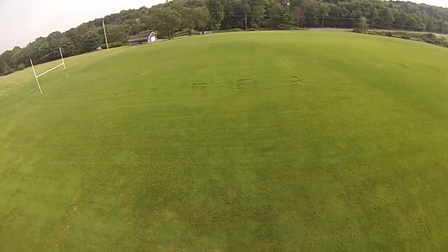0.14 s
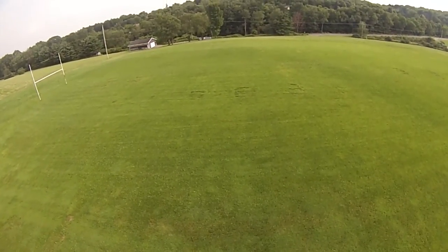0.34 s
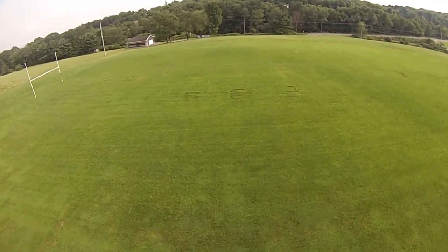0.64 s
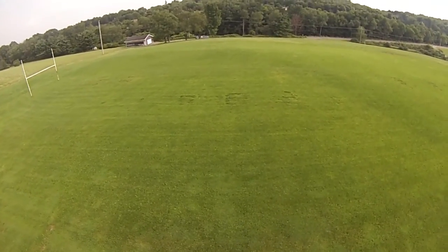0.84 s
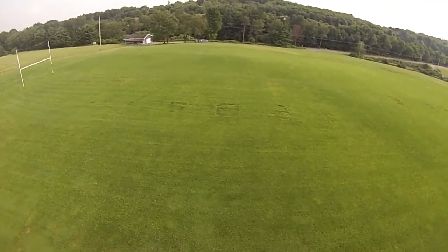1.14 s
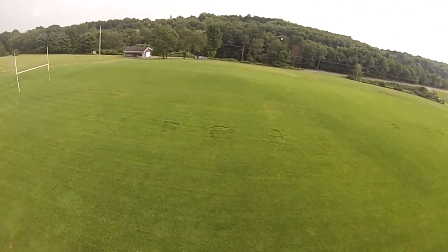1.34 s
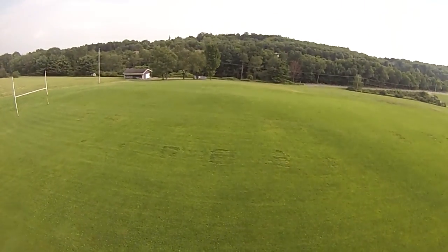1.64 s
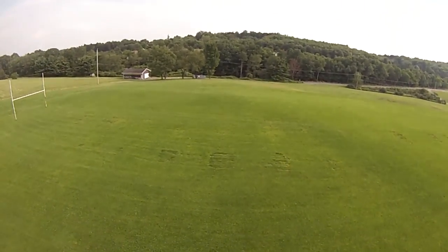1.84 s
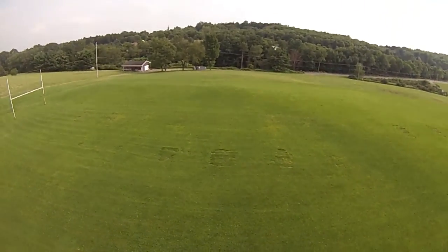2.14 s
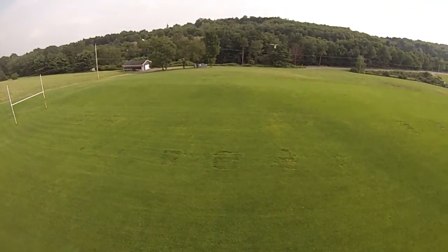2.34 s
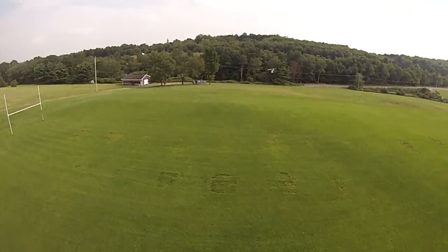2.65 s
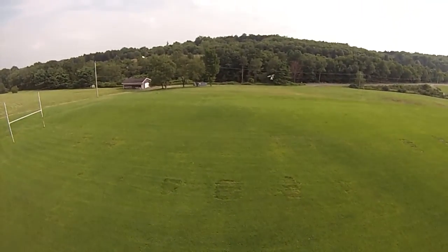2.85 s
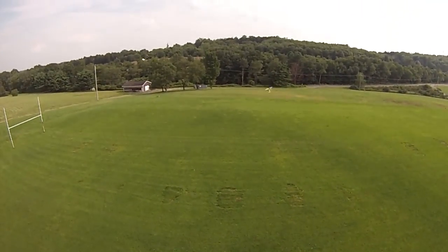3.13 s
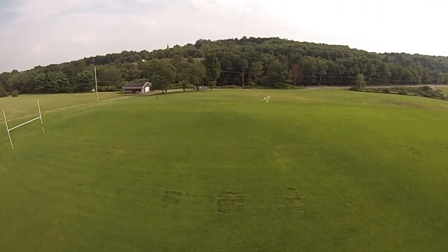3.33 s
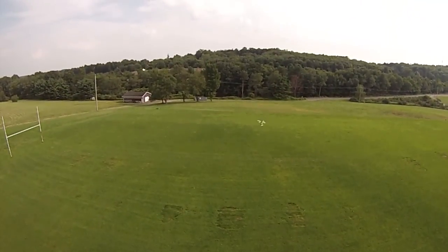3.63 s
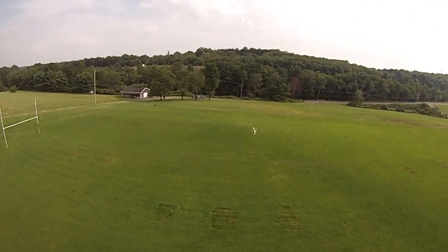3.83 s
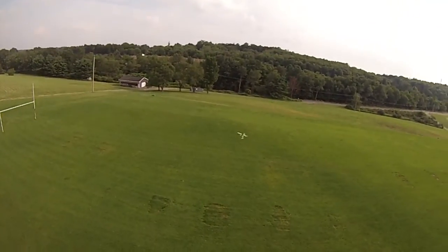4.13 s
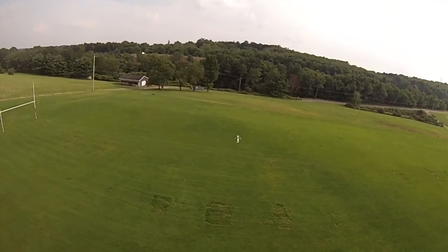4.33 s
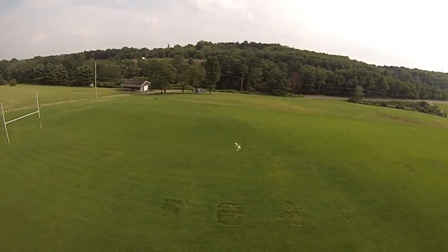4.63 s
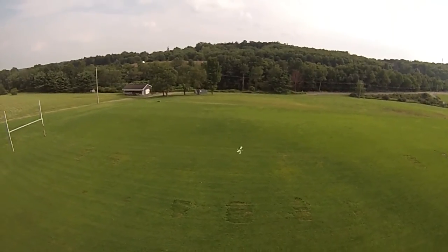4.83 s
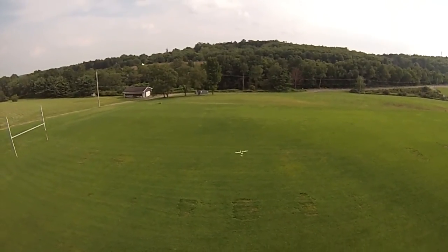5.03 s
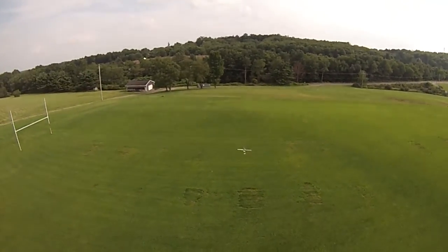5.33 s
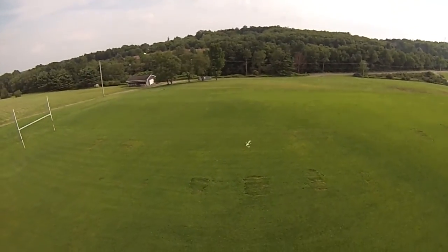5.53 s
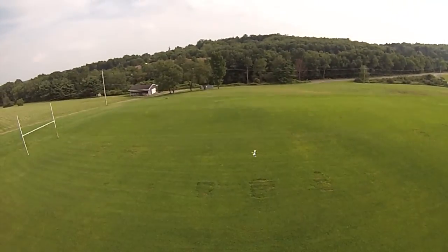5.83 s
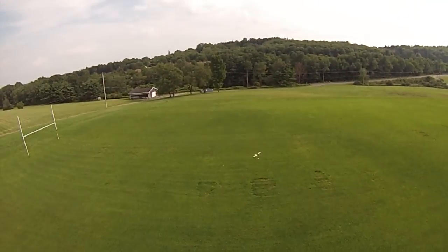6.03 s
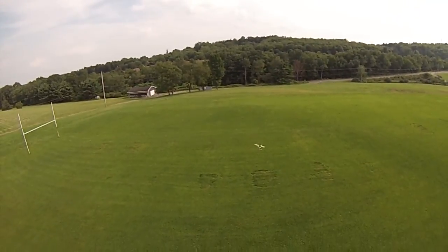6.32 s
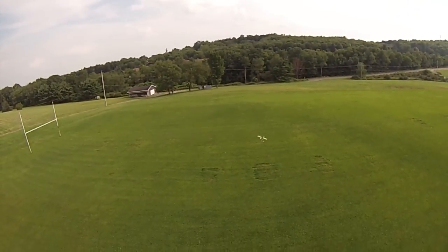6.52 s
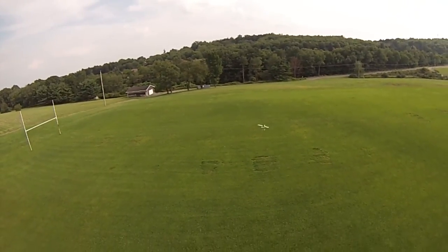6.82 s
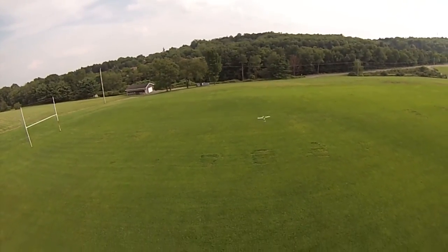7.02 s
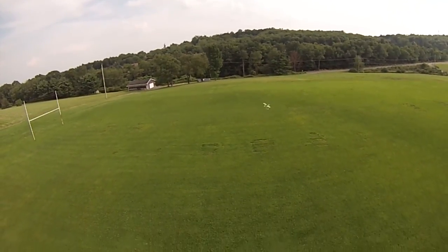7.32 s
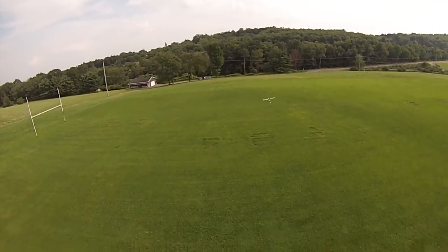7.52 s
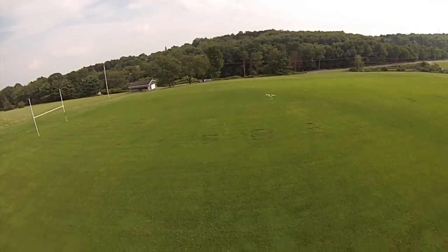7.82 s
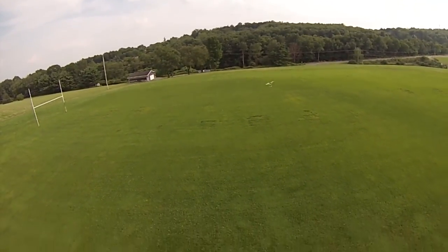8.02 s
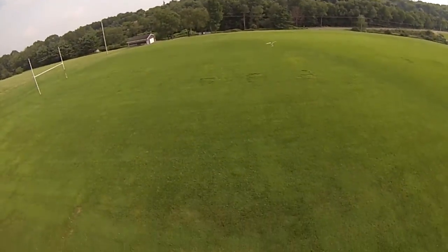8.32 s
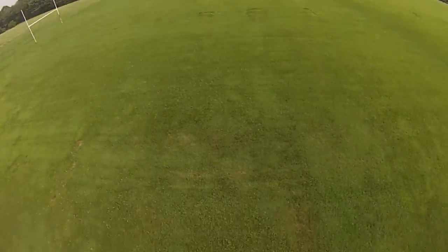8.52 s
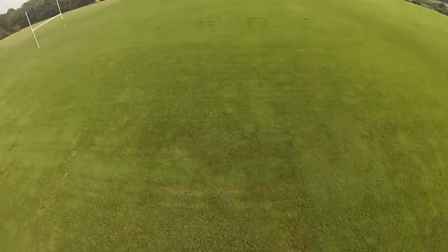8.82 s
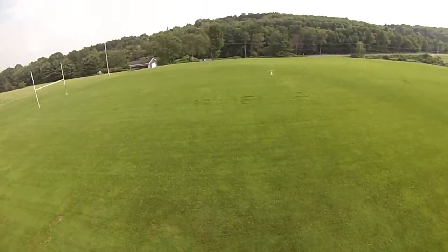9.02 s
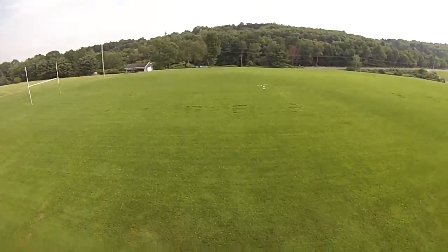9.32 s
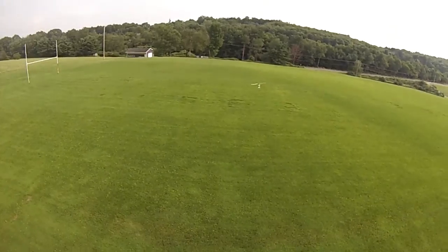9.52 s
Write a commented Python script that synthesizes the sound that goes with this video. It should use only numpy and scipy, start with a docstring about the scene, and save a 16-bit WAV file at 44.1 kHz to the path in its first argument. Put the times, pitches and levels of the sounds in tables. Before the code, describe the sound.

The microphone rides on a small quadcopter above a grassy field, very close to four spinning propellers. A dense, rough hum and buzz runs throughout, beating as the rotors drift apart in speed. Pitch sags gradually in the middle, then climbs and jumps about near the end, with soft wind gusts. Air wash, thin hiss and faint motor whistle sit above.

```python
"""Over a field, aboard a small quadcopter: the microphone is in the camera that it carries, close to all four rotors.
The two-blade rotors turn at slightly different speeds and beat; one is out of balance, two change speed to steer.
Sums of sines at multiples of each rotor's rate make the hum, blade tones, frame buzz and motor whine.
Noise pulsed by the blades drones in the camera case, washes and hisses; low noise is wind on the microphone.
A control tone with sidebands, a singing motor bell and a faint driver whistle complete the scene."""
import sys
import numpy as np
from scipy import signal
from scipy.fft import rfft, irfft, next_fast_len
from scipy.io import wavfile
from scipy.ndimage import uniform_filter1d, minimum_filter1d

SR = 44100
rng = np.random.default_rng(int(sys.argv[2]) if len(sys.argv) > 2 else 0)


def output_pcm(signal):
    """Save a mono or channel-first signal as 16-bit PCM at the path in sys.argv[1].

    Samples are clipped to [-1, 1] before scaling.
    """
    pcm = np.clip(np.atleast_2d(signal).T, -1, 1) * 32767
    wavfile.write(sys.argv[1], SR, np.round(pcm).astype(np.int16))


N = 426006
TIME = np.arange(N) / SR  # s

# Table levels are relative: each layer adds its own trims.
# unbalanced rotor's turning rate before small nudges; follows the throttle: t/s, f/Hz
THROTTLE_SPEED = [(0, 97.9), (.45, 97), (.7, 91.5), (1.99, 91.4), (2.15, 89.06), (2.35, 92.08),
                  (3.6, 87.94), (5.05, 88), (5.15, 93.1), (5.45, 89), (5.8, 94.4), (6.7, 92.2), (8, 92.13),
                  (8.1, 96.7), (8.38, 96.6), (8.5, 92.95), (8.78, 102.7), (9.1, 96.1), (9.3, 89),
                  (9.66, 86)]
# turning rate of the rotor nearest the microphone, before small nudges: t/s, f/Hz
NEAR_SPEED = [(0, 99.8), (.85, 90.45), (1.35, 92.6), (2.04, 91.5), (2.85, 88.3), (3.15, 84.3), (3.71, 81.7),
              (4.1, 83.83), (4.6, 78.94), (5.029, 77.6), (5.2, 84.1), (5.46, 73.76), (5.72, 82.6),
              (6.55, 87.9), (7.16, 95.4), (7.5, 90.75), (8.298, 100.9), (8.5, 93), (8.8, 92.54),
              (9.099, 105.3), (9.359, 88.8), (9.66, 86.15)]
# rate added to the throttle speed of the other two rotors while the craft tilts: t/s, f/Hz
STEERING_SPEED = [(0, 0), (1.15, .5), (1.45, 6), (2.3, 1), (3.9, .5), (4.6, -2), (5.901, 1.5), (6.5, -3),
                  (7.8, -1.5), (8.5, 5), (8.8, 1), (9.17, 15), (9.66, 11.5)]
# constant offsets of those two rotors from throttle plus steering, f/Hz
FAST_HZ, SLOW_HZ = 1.1, -6.5

# once-a-turn hum: t/s, level/dB
HUM_LEVEL = [(0.0, -22.3), (0.3, -20.5), (1.11, -23.4), (1.38, -16.5), (1.5, -22.4), (1.92, -21.5),
             (2.19, -28.6), (2.4, -20), (2.73, -25.5), (2.94, -19.5), (3.24, -27), (3.81, -21.5),
             (3.9, -24.8), (5.04, -27.5), (5.13, -22), (5.4, -24), (6.0, -17.5), (6.18, -20), (6.93, -19.5),
             (7.14, -25.5), (7.23, -16.5), (8.37, -19.7), (8.52, -27), (8.61, -17.5), (8.7, -21.5),
             (8.94, -17.5), (9.39, -27.5), (9.66, -25.5)]
# resonances of the camera mount: f/Hz, width/Hz, level/dB
MOUNT_MODES = [(455.5, 19, 4), (525.5, 12.3, 14.5), (555.8, 11, 9.5)]
# electronic tone from the flight controls: t/s, level/dB
CONTROL_LEVEL = [(0, -26.5), (1.3, -38), (1.6, -30), (2.2, -32), (2.7, -24.5), (3.3, -21), (3.7, -41),
                 (4.7, -16.5), (5.3, -30), (6.5, -39.5), (7.7, -27), (8.3, -24), (9.66, -23.5)]
CONTROL_HZ = 500
# blade tones: t/s, level/dB
BLADE_LEVEL = [(0.0, -24), (0.21, -34.5), (0.72, -21), (1.08, -32), (1.2, -18.5), (1.32, -25.2),
               (1.77, -23.5), (1.98, -30.5), (2.94, -23), (4.05, -20.5), (4.23, -26), (4.62, -19),
               (5.25, -24), (5.55, -17), (5.73, -25.5), (6.63, -24), (6.69, -33), (7.23, -26.0),
               (7.35, -35.5), (9.66, -23.3)]
# a rotor's vibration: multiple of the turning rate, level/dB
VIBRATION_ORDERS = [(3, -44.5), (4, -20), (5, -31.5), (6, -31), (7, -33.5), (8, -45.5), (10, -40.5),
                    (11, -43), (12, -39.5), (13, -40.5), (15, -42), (16, -40), (18, -47), (20, -45),
                    (21, -43.5), (22, -59.5), (24, -50.5)]
# the motor magnets' whine: multiple of the turning rate, level/dB
WHINE_ORDERS = [(14, -38.5), (28, -62), (42, -69.5), (56, -64.5)]
# resonances of the motor bell: f/Hz, width/Hz, level/dB
BELL_MODES = [(1315, 115, 9), (5030, 150, 6), (4530, 130, 5), (5200, 460, 4.5)]
# the mode in which a motor bell sings: f/Hz, width/Hz, level/dB
SINGING_BELL = (5090, 320, 15.2)

# wind noise at the microphone, spectrum: f/Hz, level/dB
WIND_SPECTRUM = [(12, -15), (25, -13), (37, -0.5), (52, -3.5), (68, -13.5), (100, -8), (140, -13),
                 (200, -15.5), (240, -21.5), (320, -24.5), (500, -33.5), (1500, -100)]
# gusts as the craft pitches forward and back: t/s, rise level/dB
GUST_RISES = [(8.5, 5.5), (8.8, 8.5), (9.29, 7)]
# spread (standard deviation) of a gust, t/s; wind before gusts and tilt, level/dB
GUST_SPREAD_S, WIND_DB = 0.077, -33
# camera case resonance, shaping its drone and lifting the buzz: f/Hz, level/dB
CASE_SPECTRUM = [(200, -100), (310, -25), (365, -18), (425, -9), (460, 1.5), (490, -1), (535, 1.5),
                 (580, 1), (620, -1), (660, -5.5), (720, -22), (820, -24.5), (1500, -100)]
# air washing off the blades, spectrum: f/Hz, level/dB
WASH_SPECTRUM = [(410, -38), (700, -5.5), (768, -9), (852, -7), (935, 0), (1060, 0), (1150, -6.5),
                 (1310, -3.5), (1400, -2.5), (1630, 0), (1770, -6.5), (1920, -8), (2330, -17.5),
                 (3050, -32.5), (3960, -49.5), (6710, -120)]
# blade hiss, spectrum: f/Hz, level/dB
HISS_SPECTRUM = [(1700, -16.5), (2900, 5.5), (3330, -5), (3650, 2), (4100, -3), (4500, 3), (4830, -4.5),
                 (5600, 2), (6100, -1.5), (7000, -11), (7950, -8), (9900, -18), (12700, -23.5),
                 (15000, -30)]
# small resonances of the shell, added to every noise: f/Hz, width/Hz, level/dB
SHELL_MODES = [(1330, 60, 4), (1652, 83, 2), (1874, 89, 3.5), (2440, 33, 3), (2440, 91, 0),
               (6300, 180, -4.5), (6550, 200, 1.5), (8700, 400, -4), (9100, 300, 2)]
# camera case drone: t/s, level/dB
DRONE_LEVEL = [(0.0, -16), (0.42, -19), (0.69, -16), (1.32, -17.2), (1.41, -12.5), (1.68, -19),
               (1.83, -13.5), (2.19, -21.5), (2.52, -18), (3.39, -15.5), (3.48, -23), (3.63, -16.1),
               (4.92, -17), (5.04, -18.1), (7.14, -16), (9.66, -16)]
# air wash: t/s, level/dB
WASH_LEVELS = [(0.0, -22.5), (0.18, -18), (0.24, -22.5), (1.38, -19), (2.4, -22.5), (3.24, -19),
               (3.78, -21.5), (3.93, -20), (4.98, -22.5), (5.7, -21.1), (6.03, -23), (6.12, -20),
               (6.72, -23.5), (6.99, -21.5), (8.4, -23), (8.58, -19.5), (8.73, -22), (9.66, -20)]
# blade hiss: t/s, level/dB
HISS_LEVELS = [(0.0, -41.5), (0.36, -46), (1.38, -42.5), (2.16, -48.5), (2.67, -45.5), (4.8, -44),
               (4.98, -47), (5.13, -44), (5.34, -45), (6.87, -41.5), (7.74, -42), (8.25, -44.5),
               (8.61, -43.4), (8.76, -46.5), (8.97, -40.5), (9.66, -44)]
EDGE_HZ = 15100  # top of the microphone's band


def gain_of(db):
    """Decibels to amplitude."""
    return np.exp(np.asarray(db, np.float32) * np.float32(np.log(10) / 20))


def evened(x):
    """Scales to an rms of one."""
    return x / np.sqrt(np.mean(x ** 2) + 1e-20)


def curve(rows):
    """A two-column table, joined by straight lines over time."""
    s, value = np.transpose(rows)
    return np.interp(TIME, s, value)


def read(points, hz):
    """A spectrum at any frequency, joined along log frequency."""
    f, value = np.transpose(points)
    return np.interp(np.log(hz + 1), np.log(f), value)


def bumps(modes, hz):
    """The dB that a few resonances add at each frequency."""
    hz = hz.astype(np.float32)
    return sum(db / (1 + (2 * (hz - f) / width) ** 2) for f, width, db in modes)


def wander(rate):
    """Smooth chance of about unit rms, with up to about rate changes a second."""
    t = np.linspace(0, TIME[-1], 4096)
    f = np.fft.rfftfreq(len(t), t[1])
    spectrum = rfft(rng.standard_normal(len(t))) / (1 + (f / rate) ** 2)
    return np.interp(TIME, t, evened(irfft(spectrum)))


def tone(turns):
    """A sine of about unit rms, starting anywhere in its cycle."""
    cycle = (turns - np.floor(turns)).astype(np.float32) + rng.random()
    return 2 ** .5 * np.sin(2 * np.pi * cycle)


def spin(hz, hunt=.005, hunt_rate=9):
    """Speed in Hz and angle in turns of a rotor; the stabiliser keeps nudging the throttle."""
    hz = hz * (1 + hunt * wander(hunt_rate))
    return hz, np.cumsum(hz) / SR


def imbalance(hz, turns, drone_db, hum_trim_db=0.2, waver_db=1.43, waver_rate=5,
              blade_db=-38, rattle_db=-17, flutter=0.42, flutter_rate=16, slip=0.049):
    """Once-a-turn shake hums and rattles the camera mount, hardest where order five or six meets a mode."""
    rattle = 0
    for order in (5, 6):
        level_db = drone_db + rattle_db + bumps(MOUNT_MODES, order * hz)
        strength = gain_of(level_db) * (1 + flutter * wander(flutter_rate))
        # the phase slips a little, in turns of this order
        rattle = rattle + strength * tone(order * turns + slip * wander(flutter_rate))
    hum_db = curve(HUM_LEVEL) + hum_trim_db + waver_db * wander(waver_rate)
    return gain_of(hum_db) * tone(turns) + gain_of(blade_db) * tone(2 * turns) + rattle


def controls(shake_turns, trim_db=-1.0, upper_db=-27, lower_db=-37, flutter=0.55):
    """The control tone holds its pitch; the shake gives it one sideband above and one below."""
    carrier = CONTROL_HZ * TIME
    upper = gain_of(upper_db) * tone(carrier + shake_turns)
    lower = gain_of(lower_db) * tone(carrier - shake_turns)
    plain = gain_of(curve(CONTROL_LEVEL) + trim_db) * tone(carrier)
    return plain + (1 + flutter * wander(13.0)) * (upper + lower)


def blade_tones(angles, steering_hz, near_db=-2.3, fast_db=-9.0, slow_db=-18,
                push_db_per_hz=.5, waver_db=1.75):
    """Two blades pass in each turn; the fast rotor grows louder as it pushes to steer."""
    level_db = curve(BLADE_LEVEL)
    shares_db = near_db, fast_db + push_db_per_hz * steering_hz, slow_db
    out = 0
    for share_db, turns in zip(shares_db, angles):
        out = out + gain_of(level_db + share_db + waver_db * wander(13)) * tone(2 * turns)
    return out


def buzz(hz, turns, flutter=0.34, flutter_rate=12, case_share=0.87):
    """Higher rotor orders flutter in turbulent air; the fourth to seventh swell at the case resonance."""
    out = np.zeros(N)
    for order, db in VIBRATION_ORDERS:
        lift_db = 0
        if order in range(4, 8):
            lift_db = case_share * np.maximum(read(CASE_SPECTRUM, order * hz), -20)
        out += gain_of(db + lift_db) * (1 + flutter * wander(flutter_rate)) * tone(order * turns)
    return out


def whine(hz, turns, flicker_db=3, flicker_rate=14):
    """Whistle of the motor's fourteen magnets, smeared by torque ripple, louder at the bell's modes."""
    ripple = .004 * wander(40)  # turns
    out = 0
    for order, db in WHINE_ORDERS:
        level_db = db + bumps(BELL_MODES, order * hz) + flicker_db * wander(flicker_rate)
        out = out + gain_of(level_db) * tone(order * (turns + ripple))
    return out


def singing(hz, hiss_db, level_db, ring_width=45, pull=.4, order=56):
    """A high whine order sets the bell singing: a fuzzy whistle drawn toward its mode, loudest there."""
    whine_hz = order * hz
    pitch = whine_hz + pull * (SINGING_BELL[0] - whine_hz)
    fuzz = wander(ring_width) + 1j * wander(ring_width)
    ring = fuzz * np.exp(2j * np.pi * np.cumsum(pitch) / SR)
    return gain_of(hiss_db + level_db + bumps([SINGING_BELL], whine_hz)) * ring.real


def switching(turns, hz, carrier_hz=16800, level_db=-78, order=42):
    """Motor driver switching, shifted down by the commutation rate: a faint whistle, loudest at low speed."""
    throttle_db = -.6 * np.maximum(hz - 80, 0)
    return gain_of(level_db + throttle_db) * tone(carrier_hz * TIME - order * turns + .3 * wander(60))


def coloured(drive, spectrum):
    """Gives a noise its spectrum and the resonances of the shell, at unit rms."""
    size = next_fast_len(N)
    hz = np.fft.rfftfreq(size, 1 / SR)
    response = gain_of(read(spectrum, hz) + bumps(SHELL_MODES, hz))
    return evened(irfft(rfft(drive, size) * response, size)[:N])


def wind(steering_hz, tilt_db_per_hz=0.44, full_tilt_hz=5, lumpy_db=2, lumpy_rate=6):
    """Lumpy low wind on the microphone; it grows as the craft tilts, with a few stronger gusts."""
    gusts_db = sum(db * np.exp(-.5 * ((TIME - s) / GUST_SPREAD_S) ** 2) for s, db in GUST_RISES)
    tilt_db = tilt_db_per_hz * np.clip(steering_hz, 0, full_tilt_hz)
    level_db = WIND_DB + gusts_db + tilt_db + lumpy_db * wander(lumpy_rate)
    return gain_of(level_db) * coloured(rng.standard_normal(N), WIND_SPECTRUM)


def chopped(angles, main_depth, other_depth, lopsided):
    """Noise that puffs at every blade passage, and once a turn at the unbalanced rotor."""
    main, *others = angles
    main_puffs = main_depth * tone(2 * main) + lopsided * tone(main)
    other_puffs = other_depth * sum(tone(2 * turns) for turns in others)
    return np.exp(main_puffs + other_puffs) * rng.standard_normal(N)


def stirred_air(angles, drone_db, case_db=-4.5, wash_db=-1.5, hiss_db=0.52,
                eddy_db=1.25, case_waver_db=1.5):
    """Chopped air drones in the case, washes and hisses; eddies make all surge together, the hiss least."""
    surge_db = eddy_db * wander(13.0)

    case_air = chopped(angles, main_depth=0.091, other_depth=0.11, lopsided=0.063)
    case_level_db = drone_db + case_db + surge_db + case_waver_db * wander(2.6)
    case = gain_of(case_level_db) * coloured(case_air, CASE_SPECTRUM)

    wash_air = chopped(angles, main_depth=0.11, other_depth=0.046, lopsided=0.061)
    wash_level_db = curve(WASH_LEVELS) + wash_db + surge_db
    wash = gain_of(wash_level_db) * coloured(wash_air, WASH_SPECTRUM)

    hiss_air = chopped(angles, main_depth=0.13, other_depth=0.055, lopsided=0.077)
    hiss_level_db = curve(HISS_LEVELS) + hiss_db + 0.34 * surge_db
    hiss = gain_of(hiss_level_db) * coloured(hiss_air, HISS_SPECTRUM)
    return case + wash + hiss


def scene():
    """Four rotors with the air that they stir, as they reach the microphone on board."""
    throttle, near, steering = curve(THROTTLE_SPEED), curve(NEAR_SPEED), curve(STEERING_SPEED)
    drone_db, hiss_db = curve(DRONE_LEVEL), curve(HISS_LEVELS)
    # rotor order: unbalanced, near, fast, slow
    courses = throttle, near, throttle + steering + FAST_HZ, throttle + steering + SLOW_HZ
    speeds, angles = zip(*(spin(hz) for hz in courses))

    out = imbalance(speeds[0], angles[0], drone_db)
    out += controls(angles[0])
    out += blade_tones(angles[1:], steering)
    # each motor reaches the microphone with its own strength
    buzz_db, whine_db = [-1.0, -2.2, -2.0, -10.5], [-9.5, -0.083, -5, -1.0]
    for hz, turns, b_db, w_db in zip(speeds, angles, buzz_db, whine_db):
        out += gain_of(b_db) * buzz(hz, turns)
        out += gain_of(w_db) * whine(hz, turns)
    out += singing(speeds[0], hiss_db, level_db=-26)
    out += singing(speeds[1], hiss_db, level_db=-21.0)
    out += switching(angles[1], speeds[1])
    out += wind(steering)
    out += stirred_air(angles, drone_db)
    return out[None]  # one channel


def record(dry, hold_size=441):
    """The camera's limiter eases down the tallest peaks; then very short end fades and the band limit."""
    allowed = np.minimum(1, .83 / (abs(dry) + 1e-9))
    gain = minimum_filter1d(allowed, 2 * hold_size)  # holds in samples, around each peak
    gain = uniform_filter1d(uniform_filter1d(gain, hold_size), hold_size)
    gain = gain * signal.windows.tukey(N, .001)
    band = signal.firwin(511, EDGE_HZ, window=("kaiser", 9), fs=SR)
    return signal.oaconvolve(dry * gain, band[None], "same")


dry = scene()
out = record(dry)
output_pcm(out)
```